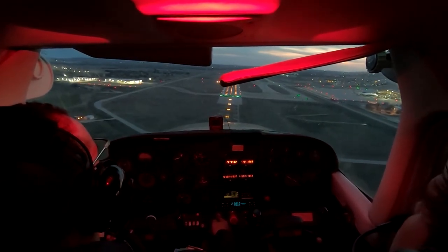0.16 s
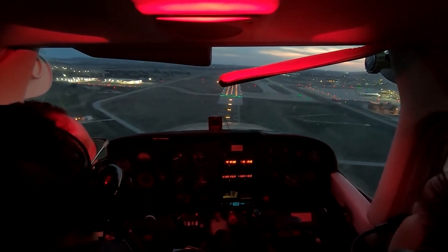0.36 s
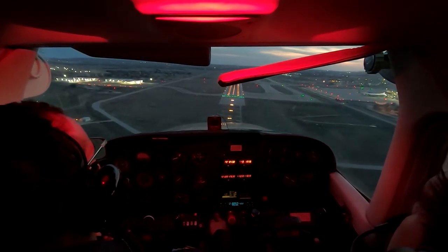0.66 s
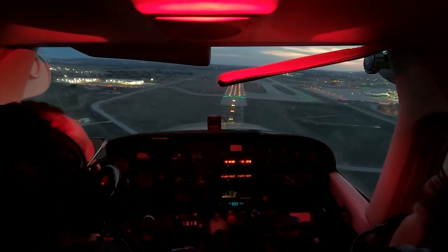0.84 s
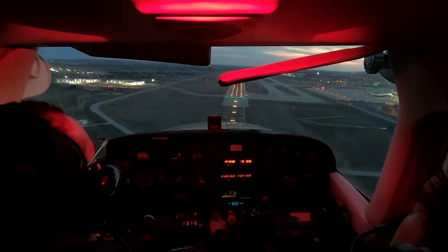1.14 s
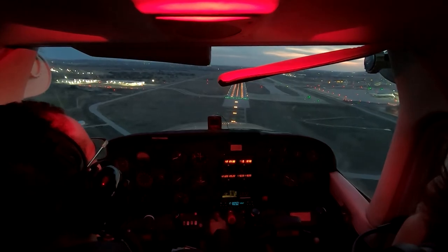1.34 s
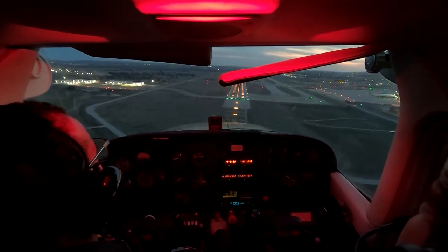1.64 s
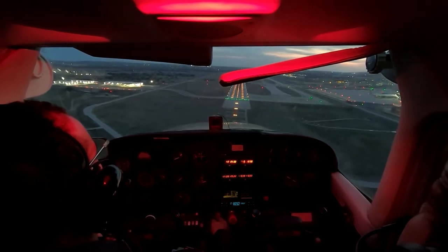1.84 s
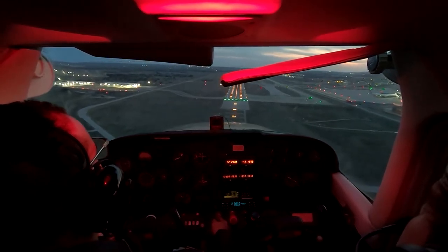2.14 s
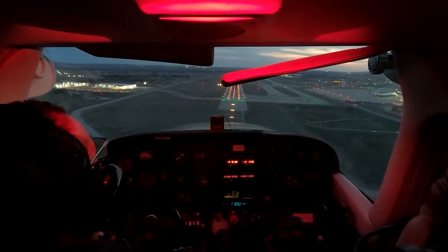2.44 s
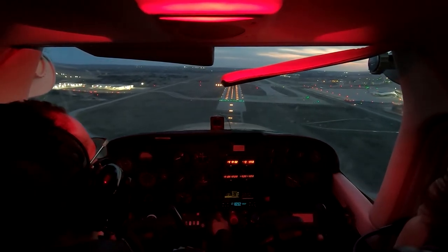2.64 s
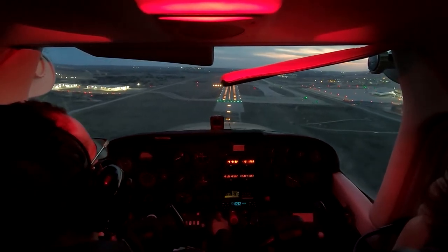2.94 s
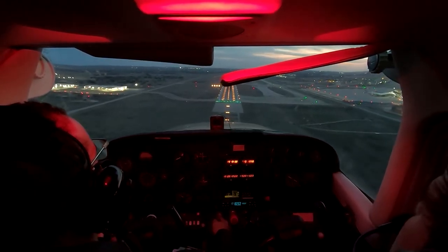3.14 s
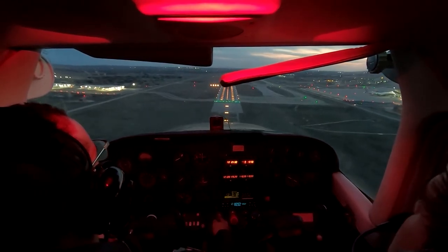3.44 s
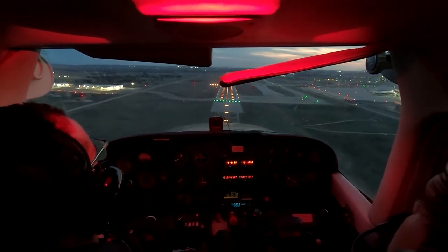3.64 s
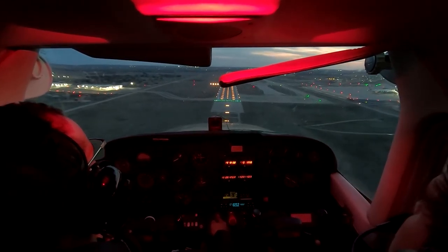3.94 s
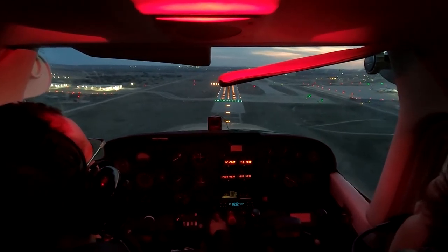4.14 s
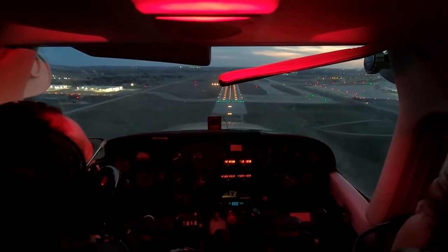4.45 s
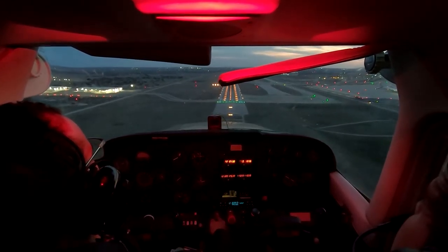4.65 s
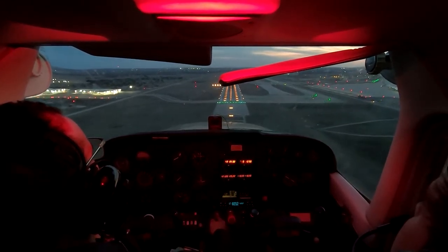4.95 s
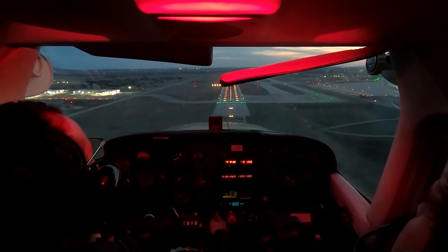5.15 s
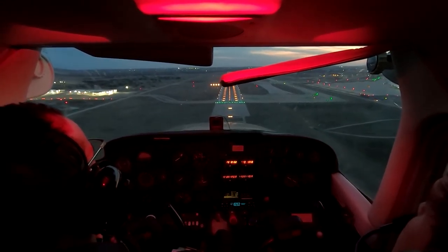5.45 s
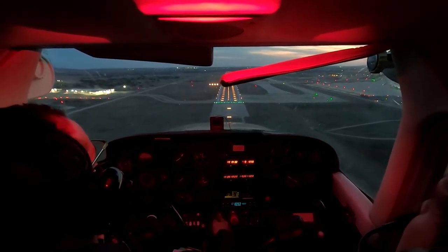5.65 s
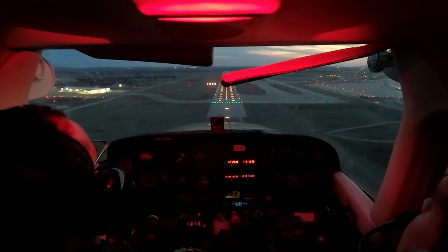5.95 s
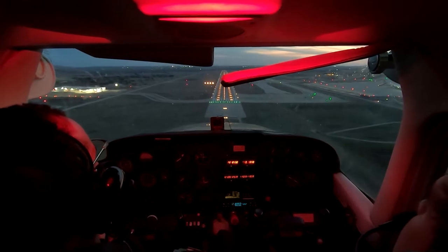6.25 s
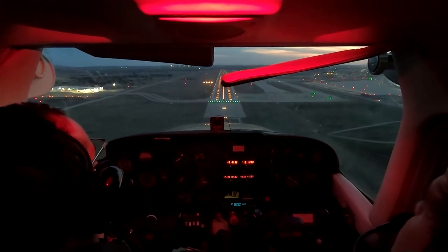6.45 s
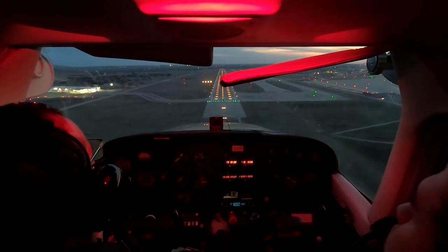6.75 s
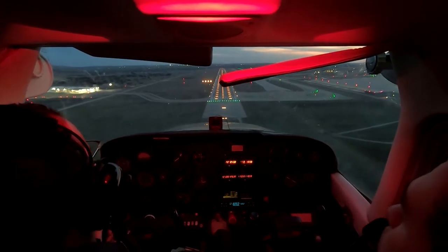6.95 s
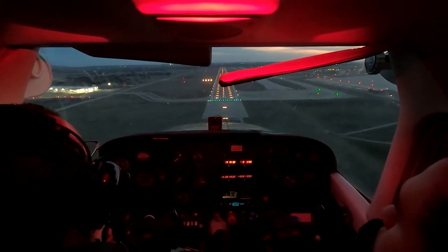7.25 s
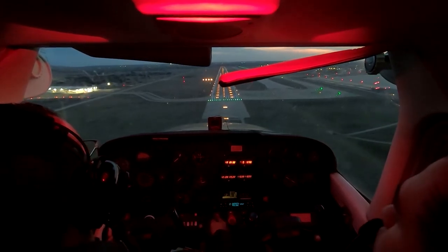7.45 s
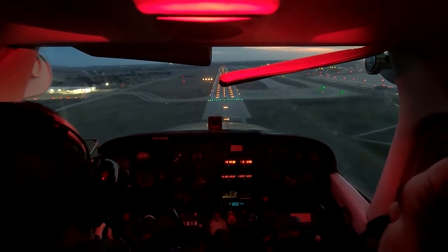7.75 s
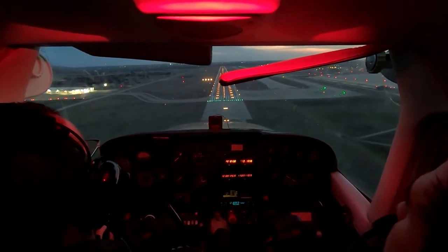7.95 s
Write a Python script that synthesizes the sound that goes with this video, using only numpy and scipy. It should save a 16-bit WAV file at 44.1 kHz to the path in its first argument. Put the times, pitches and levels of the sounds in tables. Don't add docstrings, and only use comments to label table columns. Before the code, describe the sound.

Throttled-back piston engine and propeller hum deeply in a light aircraft cabin, wrapped in airflow rumble and soft hiss, gradually slowing.

```python
import sys
import numpy as np
from scipy import signal
from scipy.fft import rfft, irfft, next_fast_len
from scipy.io import wavfile
from scipy.ndimage import uniform_filter1d

SR = 44100
rng = np.random.default_rng(int(sys.argv[2]) if len(sys.argv) > 2 else 0)


def output_pcm(signal):
    pcm = np.clip(np.atleast_2d(signal).T, -1, 1) * 32767
    wavfile.write(sys.argv[1], SR, np.round(pcm).astype(np.int16))


def invert_db(level):
    return 10 ** (np.asarray(level, dtype=float) / 20)


N = 357210
T = np.arange(N) / SR


def over(table, hz):
    f, value = np.transpose(table)
    return np.interp(np.log(hz + 1), np.log(f), value)


def walk(rate):
    hold = int(SR / rate)
    steps = np.repeat(rng.standard_normal(N // hold + 1), hold)
    return 1.18 * uniform_filter1d(uniform_filter1d(steps, hold), hold)[:N]


def sides(pan_db):
    return invert_db(np.array([[pan_db], [-pan_db]]) / 2)


# (time [s], third firing harmonic [Hz])
SHAFT_SPEED = [
    (0.0, 131.0),
    (1.2, 130.8),
    (2.2, 131.8),
    (3.0, 130.1),
    (4.6, 130.2),
    (5.6, 128.5),
    (6.6, 127.6),
    (7.4, 126.4),
    (8.1, 125.7),
]


def slowing():
    s, hz = np.transpose(SHAFT_SPEED)
    third_hz = np.interp(T, s, hz)
    return third_hz, 100 * (1 - third_hz / third_hz.mean())


# (frequency [Hz], level [dB per Hz])
AIR_COLOUR = [(12, -62.5), (25, -50.5), (50, -46.5), (112, -44.5), (135, -49.5), (160, -50),
              (270, -53.5), (430, -58), (900, -61),
              (1100, -63), (1720, -67.5), (2200, -67), (3500, -70.5), (4100, -75), (5200, -78),
               (8000, -83), (10200, -95.5), (10800, -102), (12500, -105.5), (14100, -108), (15300, -119)]
# (frequency [Hz], width [Hz], level over the colour [dB], left minus right [dB])
PANELS = [(213, 19.3, 4.5, -1), (295, 21, 1, 3.5), (340.4, 50, 5, 1), (528.5, 21, 7, 2.5),
          (568, 48, 4, -4.5), (630, 46, 2, 4.5), (672, 24, 1.5, -2), (724, 82, 5.5, -5), (818, 44, 5, -4),
          (850, 22, 7.5, -2), (877, 30, 8.5, 4), (903, 22, 9, -2), (957, 70, 1.5, 4.5), (1160, 44, 3, -0.5),
          (1270, 50, 2, -2.5), (1365, 140, 4, 2), (1583, 35, 4.5, 1), (3230, 70, 1.5, 0),
          (7730, 500, 2, -0.5)]
# (frequency [Hz], left minus right [dB])
PORT_BALANCE = [(250, -0.5), (380, 0), (600, -0.5), (2200, -2.5), (3500, 1), (7000, -2.5), (9800, 4.5),
                (11000, -0.5)]


def cabin_db(hz):
    ring_db = 0
    for f, width, db, pan_db in PANELS:
        peak_db = db + np.array([[pan_db], [-pan_db]]) / 2
        ring_db = ring_db + peak_db / (1 + (2 * (hz - f) / width) ** 4)
    balance_db = over(PORT_BALANCE, hz)
    return over(AIR_COLOUR, hz) + ring_db + np.array([balance_db, -balance_db]) / 2


# (frequency [Hz], likeness [0-1])
PORT_LIKENESS = [(120, .998), (220, .992), (270, .975), (400, .95), (560, .86), (680, .52), (1050, .45),
                 (1170, .6), (1400, .2), (2200, .48), (3300, .68), (4300, .62), (5000, .2), (9500, .25),
                 (12000, .3)]
# (frequency [Hz], left leads by [rad])
PORT_LEAD = [(70, 0), (130, .09), (400, 0), (530, -.5), (700, -.5), (950, -.7), (1150, .7), (1320, 2.7),
             (1480, .7), (2000, -.3), (3800, .3), (4500, -.2), (6000, -1.8), (8500, -2.7), (9800, -2.2),
             (11000, -1.5)]
ROAR_DB_PER_PCT, BUZZ_DB_PER_PCT, HISS_DB_PER_PCT = 0.13, 0.4, 0.28
BUFFET_S, BUFFET_LENGTH_S, BUFFET_DB = 3.4, 3.6, 4
BUZZ_FLUTTER_DB, BUZZ_FLUTTER_PER_S = 0.63, 7


def air():
    size = next_fast_len(N)
    hz = np.arange(size // 2 + 1) * SR / size
    shared, left, right = (rfft(rng.standard_normal(size)) * np.sqrt(SR / 2) for _ in range(3))
    alike = np.clip(over(PORT_LIKENESS, hz), 0, 1)
    turn = np.exp(.5j * over(PORT_LEAD, hz))
    pair = np.sqrt(alike) * shared * [turn, 1 / turn]
    pair = pair + np.sqrt(1 - alike) * np.array([left, right])
    pair *= invert_db(cabin_db(hz))

    lost = slowing()[1]
    buffet_db = BUFFET_DB * np.exp(-((T - BUFFET_S) / BUFFET_LENGTH_S) ** 2)
    buffet_db = buffet_db - buffet_db.mean()
    roar_db = -ROAR_DB_PER_PCT * lost
    buzz_db = BUZZ_FLUTTER_DB * walk(BUZZ_FLUTTER_PER_S) - BUZZ_DB_PER_PCT * lost
    hiss_db = -HISS_DB_PER_PCT * lost
    leak_db = 1.6 * walk(13)

    place = 3 * np.log2((hz + 1) / 12)
    out = 0
    for band in range(32):
        if band <= 11:
            swell_db = buffet_db
        elif band <= 17:
            swell_db = roar_db
        elif band <= 19:
            swell_db = buzz_db
        else:
            swell_db = hiss_db
        if band > 29:
            swell_db = swell_db + leak_db
        flicker_db = 0.45 * walk(3.8) + (1.2 if band < 20 else .6) * walk(14)
        share = np.clip(1 - np.abs(place - band), 0, 1)
        out = out + invert_db(swell_db + flicker_db) * irfft(pair * share, size)[:, :N]
    return out


# (frequency [Hz], level [dB], left minus right [dB])
GYRO_TONES = [(2384.8, -59, -5), (3495.1, -64, 4), (4229.9, -66, 2), (4696.9, -68, -4), (4784.4, -68, 4),
              (6809.5, -72, 3)]


def gyros():
    out = 0
    for f, db, pan_db in GYRO_TONES:
        tone = np.sin(2 * np.pi * f * T + 6 * rng.random())
        out = out + np.sqrt(2) * invert_db(db + 0.79 * walk(2.1)) * tone * sides(pan_db)
    return out


# (multiple of the cycle, level over air noise [dB per Hz])
CLATTER_PEAKS = [(43, -9), (46, 7), (52, 8), (69, 10), (70, 10), (77, 7), (78, 7.5), (89, -2), (90, -2),
                 (126, 8)]
CLATTER_FIRST, CLATTER_END = 33, 130
CLATTER_DB, CLATTER_SCATTER_DB = 4.0, 2.5
CLATTER_KNEE, CLATTER_FADE_DB = 80, -5


def clatter(cycle):
    k = np.arange(CLATTER_FIRST, CLATTER_END)
    hz = k * slowing()[0].mean() / 12
    over_db = CLATTER_DB + CLATTER_SCATTER_DB * rng.standard_normal(len(k))
    over_db = over_db + CLATTER_FADE_DB * (k > CLATTER_KNEE)
    for multiple, db in CLATTER_PEAKS:
        over_db[multiple - k[0]] = db
    level = invert_db(cabin_db(hz) + over_db)

    angle = np.linspace(0, 2 * np.pi, 4097)
    lead = over(PORT_LEAD, hz) + .9 * rng.standard_normal(len(k))
    phase = 2 * np.pi * rng.random(len(k)) + np.outer([.5, -.5], lead)
    waves = np.cos(k[:, None] * angle + phase[:, :, None])
    one_turn = np.sqrt(2) * (level[:, :, None] * waves).sum(axis=1)
    played = np.array([np.interp(cycle % (2 * np.pi), angle, ch) for ch in one_turn])
    return invert_db(0.27 * walk(2.82)) * played


# (multiple of the cycle, level at mean speed [dB], gain per speed lost [dB per %], wander [dB])
MAIN_ORDERS = [
    (3, -33.5, -1.8, 0.8),
    (4, -21, 0.9, 0.6),
    (8, -24.8, 0.2, 0.7),
    (12, -21.8, -0.2, 0.3),
    (16, -31.5, -1.3, 0.3),
    (20, -34.5, 1.0, 0.6),
    (43, -45, -2.2, 1.2),
]
# (multiple of the cycle, level re third firing harmonic [dB])
LESSER_ORDERS = [(2, -31), (6, -15), (7, -16.5), (5, -30), (9, -15), (10, -23), (11, -17), (13, -24),
                 (14, -25), (17, -26), (18, -20), (19, -23), (21, -24), (22, -25), (24, -27), (32, -23)]
SPREAD_RAD, START_RAD = .056, 3.6
NULL_HZ, NULL_WIDTH_HZ, NULL_DB = 215.2, 2.8, -14


def engine(cycle):
    third_hz, lost = slowing()
    levels = []
    for k, db, gain, wander in MAIN_ORDERS:
        k = round(k)
        off_null = 2 * (k * third_hz / 12 - NULL_HZ) / NULL_WIDTH_HZ
        null_db = NULL_DB / (1 + off_null ** 4)
        levels.append((k, db + gain * lost + wander * walk(2.5) + null_db))
    third_db = MAIN_ORDERS[3][1]
    for k, db in LESSER_ORDERS:
        levels.append((k, third_db + db + 1.0 * walk(2.0)))

    out = 0
    for k, db in levels:
        dent = np.pi * (k % 4 > 0 and k < 8)
        phase = SPREAD_RAD * k ** 2 + START_RAD + dent
        out = out + invert_db(db + 0.48 * walk(8)) * np.cos(k * cycle + phase)
    return np.sqrt(2) * out


def scene():
    cycle_hz = slowing()[0] / 12 * (1 + .0007 * walk(5))
    cycle = 2 * np.pi * np.cumsum(cycle_hz) / SR
    drone = engine(cycle)
    drone_pair = np.array([drone, np.r_[drone[:4], drone[:-4]]])
    return air() + gyros() + clatter(cycle) + drone_pair


def low_pass(x):
    return signal.sosfilt(signal.butter(12, 15300, fs=SR, output="sos"), x)


PORT_CUT_HZ, RIGHT_DB = (5.0, 20.0), .55


def record(dry):
    ports = []
    for hz, ch in zip(PORT_CUT_HZ, dry):
        b, a = signal.butter(1, hz, "high", fs=SR)
        ports.append(signal.lfilter(b, a, ch))
    rounded = np.tanh(1.093 * np.array(ports) * sides(-RIGHT_DB)) / 1.045
    mix = rounded - .0012
    return low_pass(mix)


dry = scene()
out = record(dry)
output_pcm(out)
```